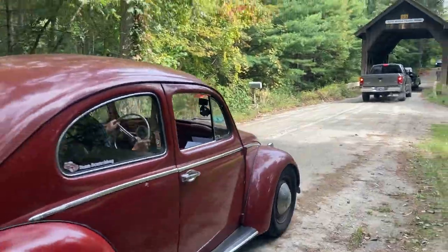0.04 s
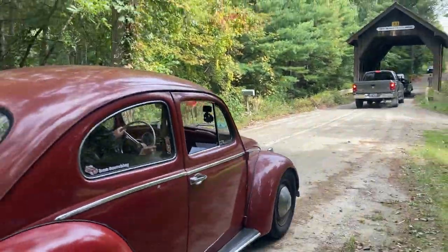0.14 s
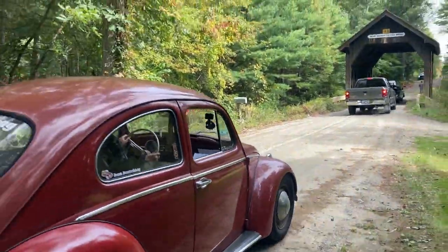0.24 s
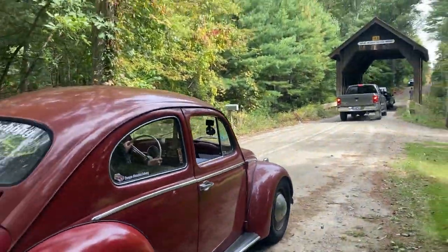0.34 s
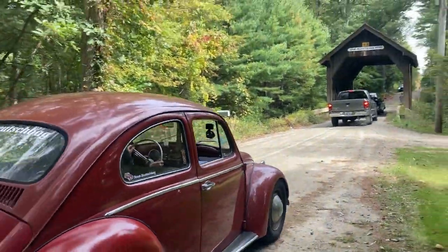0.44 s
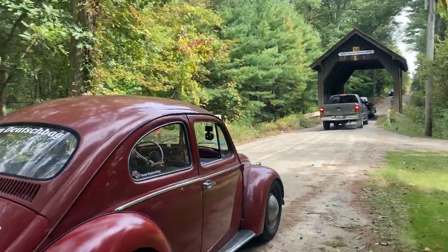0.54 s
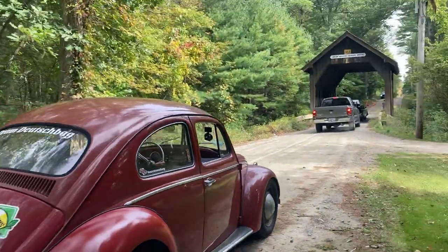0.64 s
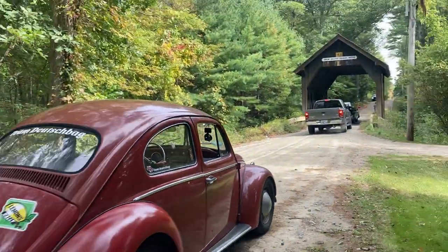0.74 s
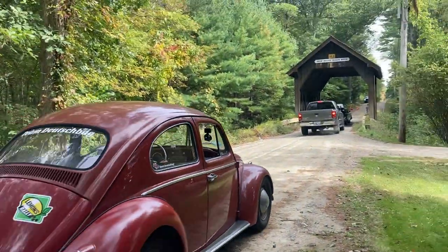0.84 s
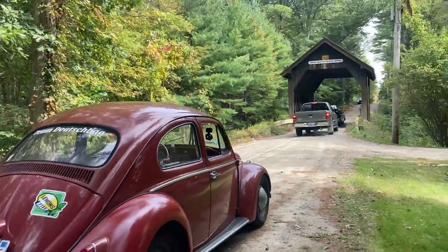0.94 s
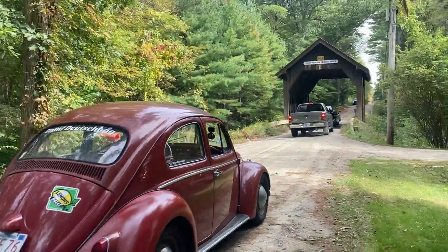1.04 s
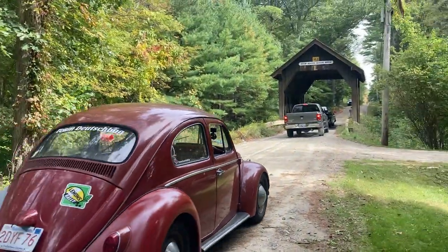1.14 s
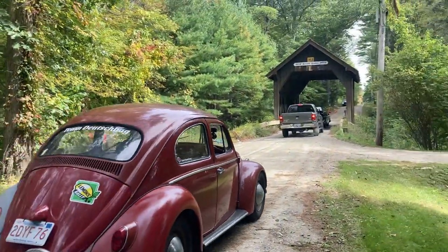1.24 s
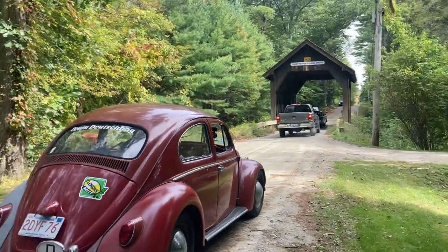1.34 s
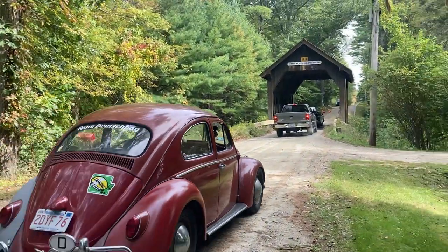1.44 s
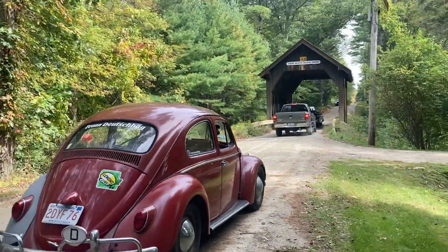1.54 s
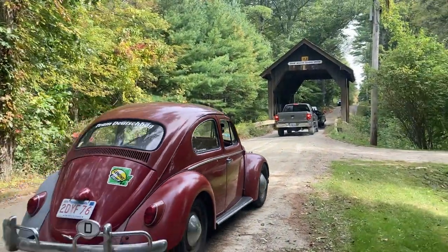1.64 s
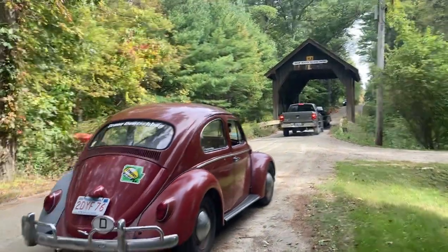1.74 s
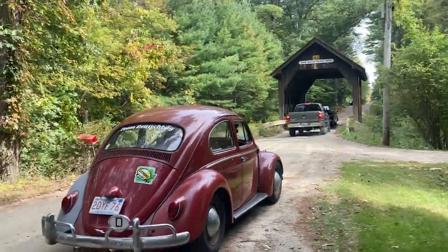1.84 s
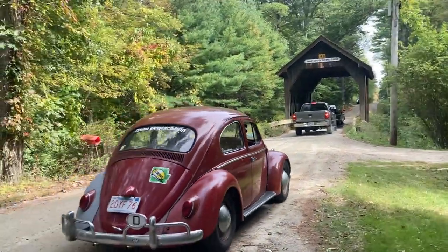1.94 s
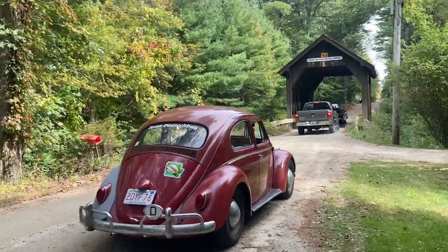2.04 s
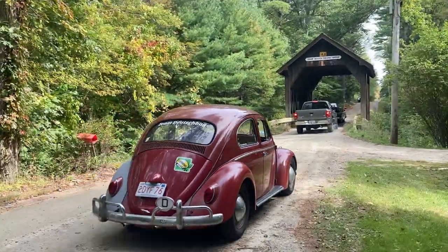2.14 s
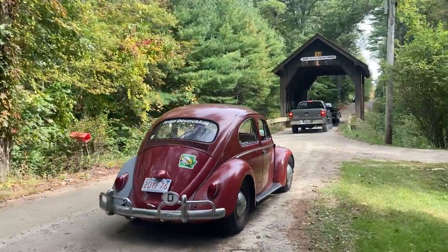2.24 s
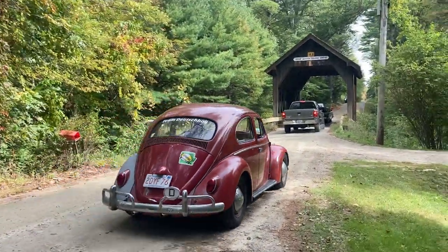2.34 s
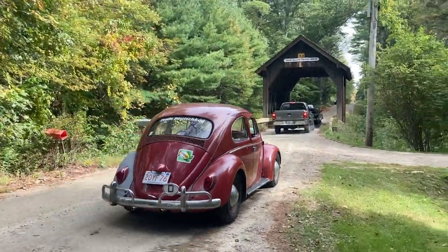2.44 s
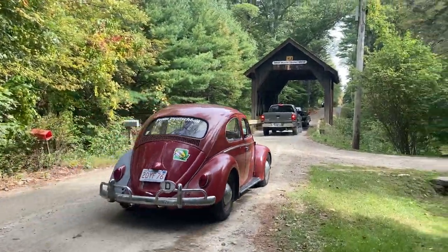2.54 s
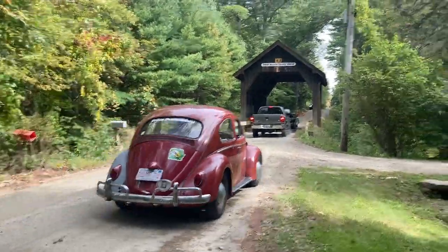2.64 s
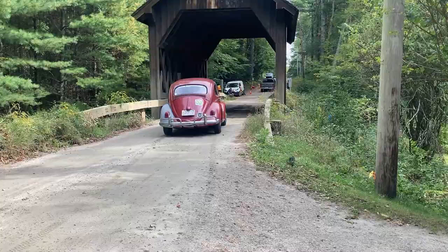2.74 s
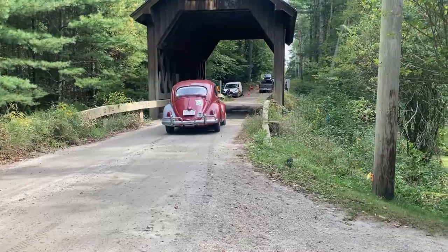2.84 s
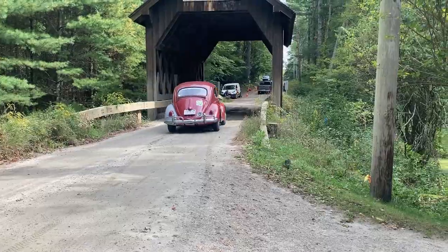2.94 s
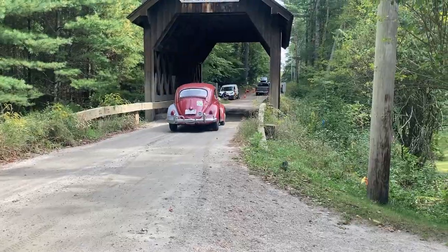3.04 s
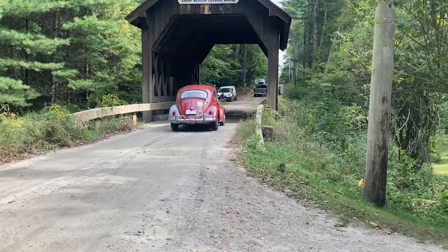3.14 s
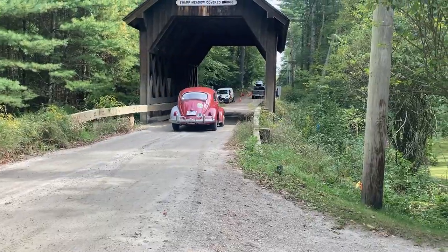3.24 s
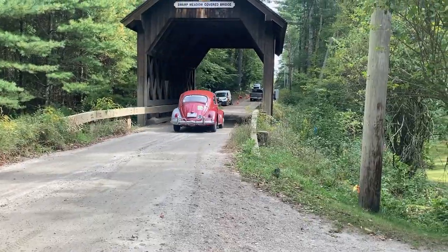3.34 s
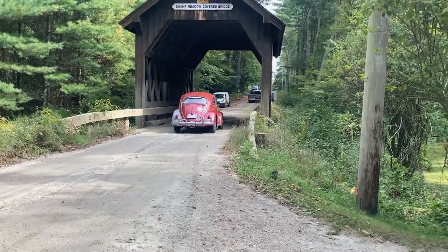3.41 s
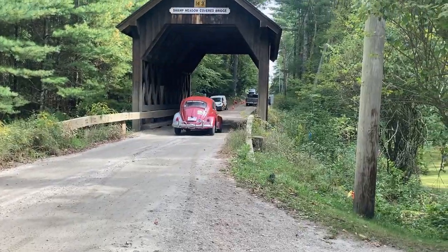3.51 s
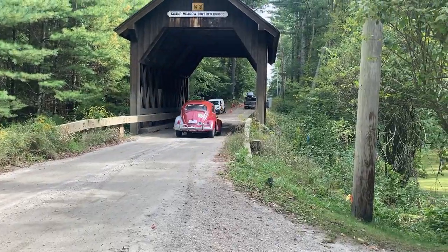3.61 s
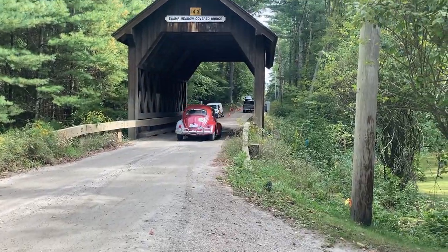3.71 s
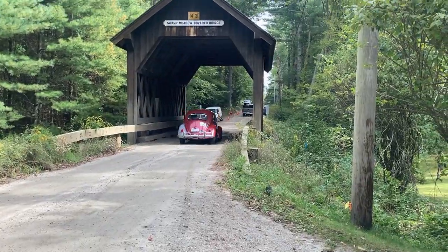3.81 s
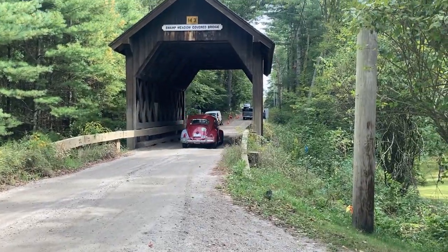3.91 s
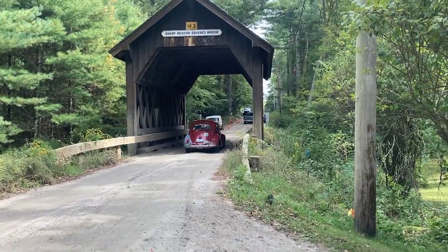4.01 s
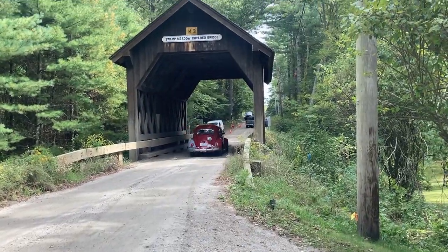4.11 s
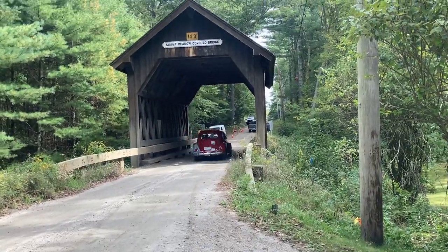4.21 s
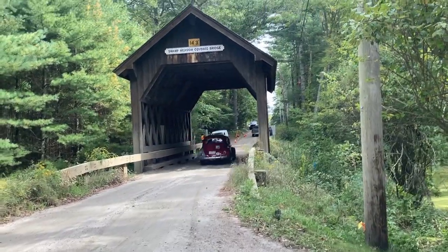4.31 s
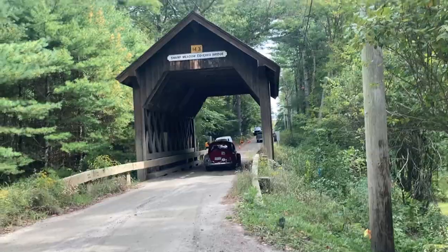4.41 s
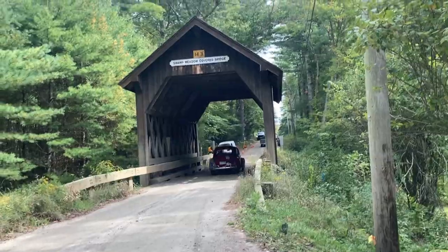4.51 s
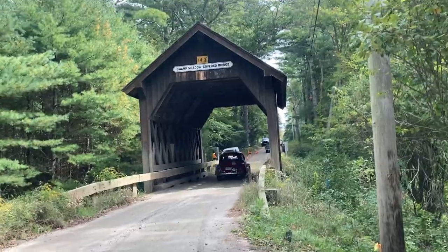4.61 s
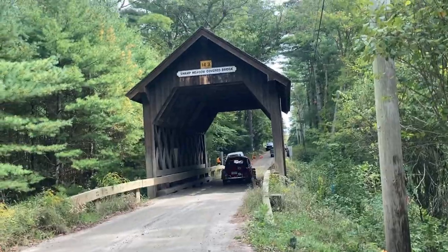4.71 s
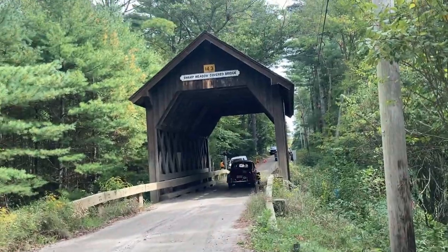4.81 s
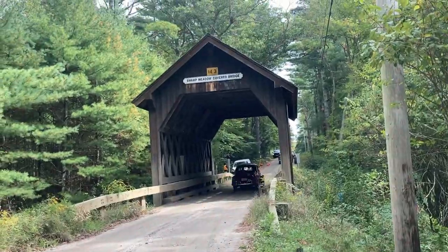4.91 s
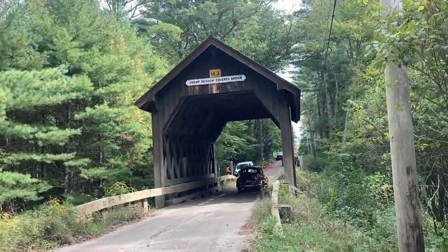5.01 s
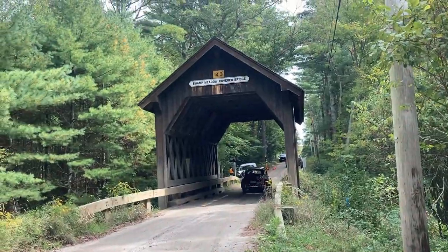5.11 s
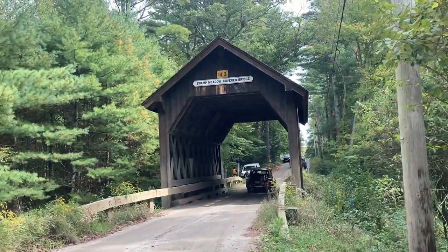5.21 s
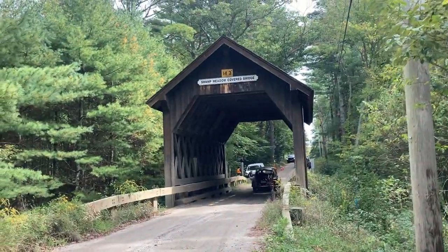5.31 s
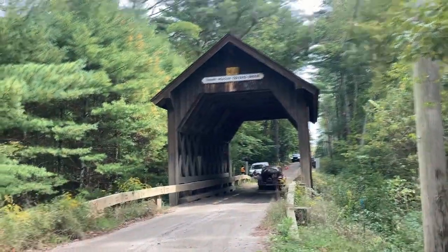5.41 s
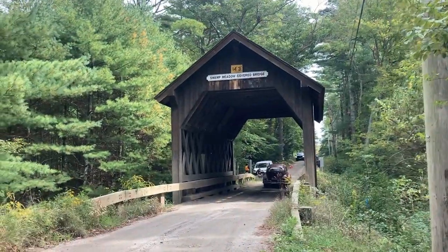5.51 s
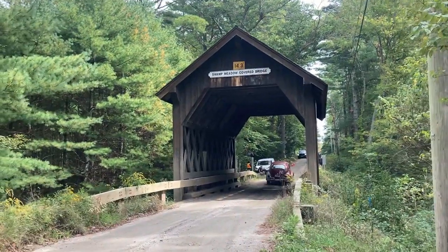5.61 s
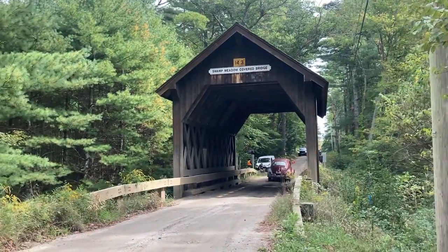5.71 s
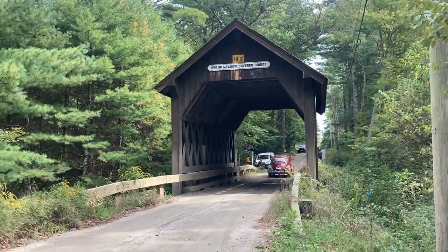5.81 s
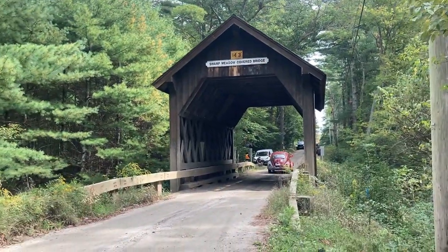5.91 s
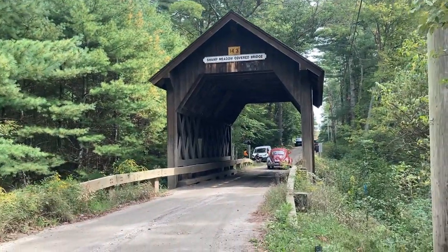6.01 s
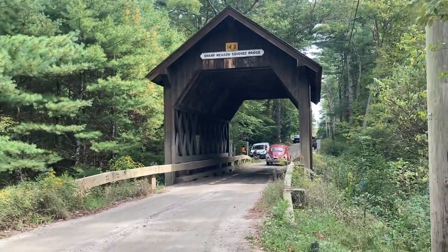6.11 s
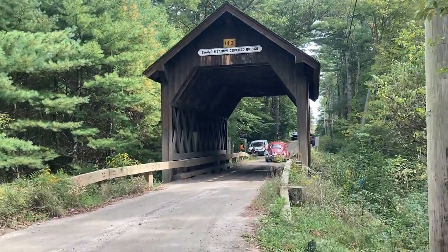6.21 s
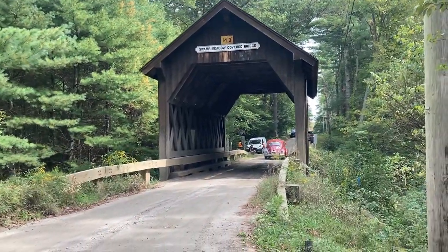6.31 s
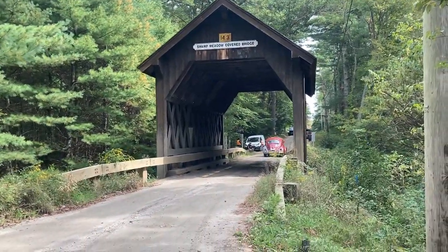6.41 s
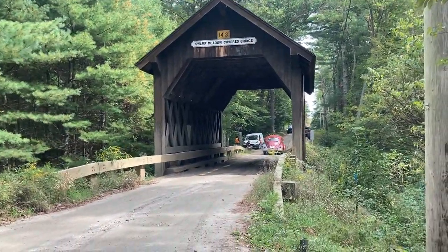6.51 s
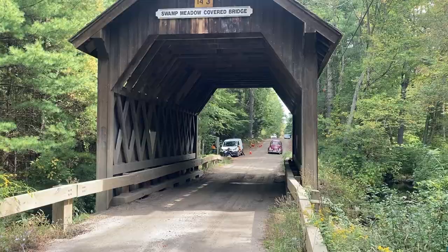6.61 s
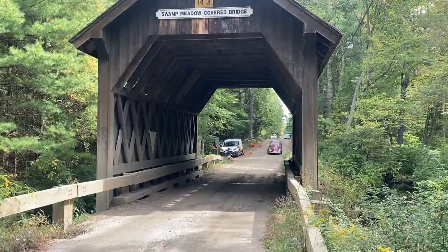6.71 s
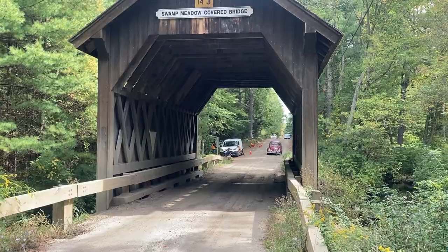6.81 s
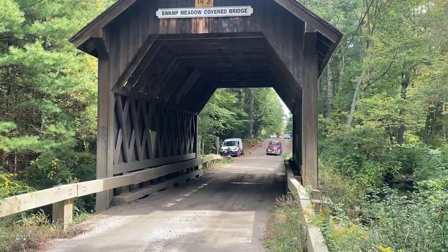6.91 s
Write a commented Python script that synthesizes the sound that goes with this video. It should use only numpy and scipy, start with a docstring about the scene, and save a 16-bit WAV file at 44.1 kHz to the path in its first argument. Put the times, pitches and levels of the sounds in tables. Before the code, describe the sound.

An old car's air-cooled engine lopes away with clanks and high chirps, then drones through a covered wooden bridge and fades.

```python
"""A loping engine beat: an old air-cooled flat-four pulls away on one cylinder too few, then drones through
a covered wooden bridge and fades. Each firing is a pressure pulse that excites the exhaust pipes, and the
bridge reinforces the harmonics near its resonances. Under load, gas chirps through a leaky exhaust joint.
Valve ticks and clanks ring the engine's sheet metal over the turbulent noise of fan, tyres and leaves;
a few hollow knocks and clicks of grit sound in between."""
import sys
import numpy as np
from scipy import signal
from scipy.fft import rfft, irfft, next_fast_len
from scipy.io import wavfile
from scipy.ndimage import uniform_filter1d, map_coordinates

SR = 44100
rng = np.random.default_rng(int(sys.argv[2]) if len(sys.argv) > 2 else 0)


def to_wav(sig):
    """Store sig (one row per channel, or 1-D mono) as 16-bit WAV at the path in sys.argv[1].

    Samples outside -1..1 are clipped; the rate is SR.
    """
    pcm = np.clip(np.atleast_2d(sig), -1, 1) * 32767
    pcm = np.round(pcm).astype(np.int16)
    wavfile.write(sys.argv[1], SR, pcm.T)  # frames by channels


N = 306495
TIME = np.arange(N) / SR
CYCLE = 4  # firings per engine cycle; "crank" is the running count of firings
SPLIT_HZ = 6400  # the stereo image follows the car only below this

# engine speed: time_s, firing_rate_hz
FIRING_RATE = [(0.0, 39.06), (0.72, 40.5), (1.0, 37.36), (1.31, 39.92), (1.45, 36.58), (1.74, 49.76),
               (1.95, 45.11), (2.28, 43.78), (2.6, 40.01), (3.25, 39.71), (3.8, 32.67), (4.25, 27.92),
               (4.75, 31.63), (5.4, 34.96), (5.95, 36.68), (6.3, 32.59), (6.95, 31.02)]
# spectrum of the fan inside the bridge: frequency_hz, level_db
HALL_SPECTRUM = [(200, -5), (310, -11), (400, -11), (490, 5.5), (565, 0.5), (660, 1), (810, 1), (1100, -4),
                 (1380, -7.5), (1490, -8), (1620, -5.5), (1900, -10), (2800, -20)]
# bright spectrum of escaping gas and of grit: frequency_hz, level_db
BRIGHT_SPECTRUM = [(1800, -32), (3500, -10), (5200, -12.5), (7500, -9), (11000, -7), (15500, -20.5)]


def amp(db):
    """Decibels to amplitude ratio."""
    return 10 ** (np.asarray(db) / 20)


def unit(x):
    """Normalisation to rms 1."""
    return x / np.sqrt(np.mean(x ** 2) + 1e-20)


def steady(x):
    """Running normalisation to rms 1 over a few tenths of a second."""
    size = SR // 5
    power = np.mean(np.atleast_2d(x) ** 2, axis=0)
    return x / np.sqrt(np.abs(uniform_filter1d(uniform_filter1d(power, size), size)) + 1e-20)


def along(points, hz):
    """Interpolation of (frequency_hz, value) points on a logarithmic frequency axis."""
    frequencies, values = np.transpose(points)
    return np.interp(np.log(hz + 1), np.log(frequencies + 1), values)


def curves(rows):
    """Linear interpolation, sample by sample, of each column after the time."""
    times, *columns = np.transpose(rows)
    return [np.interp(TIME, times, column) for column in columns]


def wobble(rate_hz):
    """Smooth random modulation: a spline through rate_hz random values a second."""
    return map_coordinates(rng.standard_normal(int(N * rate_hz / SR) + 4), [TIME * rate_hz])


def gate(crank, at, width, period):
    """Periodic Gaussian pulse; position, width and period are in firings."""
    offset = np.mod(crank - at + period / 2, period) - period / 2
    return np.exp(-.5 * (offset / width) ** 2)


def bursts(events, rise_s, fall_s):
    """Envelope with an exponential attack and decay at each (start_s, level_db) event."""
    envelope = np.zeros(N)
    for s, db, *_ in events:
        t = TIME[:min(SR // 4, N - round(s * SR))]
        envelope[round(s * SR):][:len(t)] += amp(db) * (1 - np.exp(-t / rise_s)) * np.exp(-t / fall_s)
    return envelope


def add(track, start_s, sound):
    """Superposition of a sound on a stereo track."""
    track[:, round(start_s * SR):][:, :sound.shape[1]] += sound


def filtered(x, response):
    """Linear filtering: the spectrum is multiplied by a complex frequency response."""
    size = next_fast_len(N + SR // 2)
    return irfft(rfft(x, size) * response(np.fft.rfftfreq(size, 1 / SR)), size)[..., :N]


def impulse_response(spectrum, size=16384):
    """Minimum-phase response with the given magnitude, by folding the cepstrum."""
    cepstrum = irfft(np.log(amp(along(spectrum, np.fft.rfftfreq(size, 1 / SR)))))
    cepstrum[1:size // 2] *= 2
    cepstrum[size // 2 + 1:] = 0
    return irfft(np.exp(rfft(cepstrum)))


def noise(spectrum):
    """Partially coherent stereo noise of rms 1, nearly mono in the bass."""
    # likeness of left and right: frequency_hz, correlation
    coherence = [(200, 0.94), (500, 0.94), (1200, 0.73), (2000, 0.32), (4500, 0.66), (6000, 0.31),
                 (7000, 1), (15000, 1)]

    def colour(hz):
        angle = np.arccos(np.clip(along(coherence, hz), -1, 1)) / 2
        lowpass = 1 / (1 + (hz / spectrum[-1][0] / 2) ** 4)
        highpass = 1 / (1 + (spectrum[0][0] / 2 / (hz + 1)) ** 4)
        return lowpass * highpass * amp(along(spectrum, hz)) * np.array([np.cos(angle), np.sin(angle)])
    mid, side = filtered(rng.standard_normal((2, N)), colour)
    return unit(np.array([mid + side, mid - side]))


def multipath(x, depth_db, size=1024):
    """Multipath fading: narrow bands swell and sink as the sound finds shifting paths."""
    bands = signal.stft(x, nperseg=size)[2]
    fading = uniform_filter1d(rng.standard_normal(bands.shape[1:]), size=3, axis=0)
    fading = unit(uniform_filter1d(fading, size=18, axis=1))
    return unit(signal.istft(bands * amp(depth_db * fading), nperseg=size)[1][:, :N])


def road_reflection(x, share, dull_hz=4500):
    """Comb filtering: a duller reflection off the road interferes with the direct sound."""
    # delay of the reflection as the car moves: time_s, lag_ms
    delays = [(0, .87), (.6, .87), (1.15, .74), (1.6, .85), (1.95, .88), (2.25, 1), (2.45, 1.02),
              (2.75, .83), (2.95, .85), (3.2, 1.15), (3.85, 1.66), (4.55, 1.37), (5.45, 1.35), (5.9, 1.6),
              (6.95, 1.66)]
    lag_s = curves(delays)[0] / 1000
    bounce = filtered(x, lambda hz: share / (1 + (hz / dull_hz) ** 4))
    return steady(x + np.array([np.interp(TIME - lag_s, TIME, side) for side in bounce]))


def reverberation(x):
    """Diffuse reflections from trees and timber walls form a short, exponentially decaying tail."""
    # reverberation time of the bridge: frequency_hz, t60_s
    decay_times = [(60, 0.4), (200, 0.95), (1000, 0.14), (8000, 0.19)]
    hz, t, bands = signal.stft(rng.standard_normal(SR // 2), SR, nperseg=256)
    tail = signal.istft(bands * amp(-60 * t / along(decay_times, hz)[:, None]), SR, nperseg=256)[1]
    return signal.fftconvolve(x, tail / np.linalg.norm(tail))[:N]


def beyond(fade_s, exit_s=6.185):
    """Linear ramp from 0 to 1 as the car leaves the far end of the bridge."""
    return np.clip((TIME - exit_s) / fade_s, 0, 1)


def placed(x):
    """An arrival-time difference carries the car from the left to the centre."""
    # head start at the left microphone: time_s, lead_ms
    bearing = [(0, 0.25), (1.2, 0.22), (2.1, 0.099), (3.2, 0.096), (5.2, -0.035), (6.95, -0.018)]
    lead_s = curves(bearing)[0] / 1000
    low = filtered(x, lambda hz: hz < SPLIT_HZ)
    moved = [map_coordinates(side, [(TIME + sign * lead_s / 2) * SR], mode="nearest")
             for side, sign in zip(low, (1, -1))]
    return x - low + np.array(moved)


def rumble():
    """Low noise under random amplitude modulation makes a faint, uneven rumble."""
    # rumble spectrum: frequency_hz, level_db
    spectrum = [(22, -24), (40, -10.5), (65, 1.5), (110, -6.5), (200, -10.5), (350, -21.5), (800, -31.5)]
    return amp(-36.5 + 2.5 * wobble(12)) * noise(spectrum)


def roadside(t60_s=0.037):
    """Impact sounds: a knock is a thud with two damped woody modes, a grit click a brief noise burst."""
    # hollow knocks: start_s, level_db, pitch_hz
    knocks = [(4.569, -32, 650), (4.852, -41, 1390), (4.861, -24.5, 464), (5.305, -26, 375),
              (6.025, -28, 810), (6.037, -31, 806), (6.786, -29, 380), (6.833, -34, 896)]
    # spectrum of their thud: frequency_hz, level_db
    thud_spectrum = [(60, -21), (150, 4), (350, 11.5), (800, 4.5), (1600, -0.5), (3000, -11), (8000, -24)]
    # clicks of grit: start_s, level_db
    grit = [(3.5394, -48), (5.7788, -27.5), (6.764, -34.5)]
    wood, t = np.zeros(N), TIME[:SR // 10]
    for s, db, hz in knocks:
        modes = np.sin(2 * np.pi * hz * t) + 0.41 * np.sin(2 * np.pi * 1.49 * hz * t)
        wood[round(s * SR):][:len(t)] += amp(db - 2 - 60 * t / t60_s) * modes
    thuds = bursts(knocks, rise_s=0.00098, fall_s=0.017) * noise(thud_spectrum)
    clicks = bursts(grit, rise_s=0.00037, fall_s=0.0075) * noise(BRIGHT_SPECTRUM)
    return wood + amp(-6) * (thuds + clicks)


def throb(crank, t60_s=0.26, accent=0.39):
    """Periodic excitation: each firing rings the timber hall alike, so the harmonics follow the revs."""
    firings = np.arange(int(crank[-1]))
    onsets = np.round(np.interp(firings, crank, TIME) * SR).astype(int)
    beats = np.bincount(onsets, 1 + accent * (firings % 2), N)
    t = TIME[:SR // 4]
    tail = noise(HALL_SPECTRUM)[:, :len(t)] * amp(-60 * t / t60_s)
    return steady(signal.fftconvolve(beats[None], tail, axes=1)[:, :N])


def moving_air(crank, inside, mouth_s=2.74, mouth_fade_s=0.55):
    """Turbulence noise: whirr and hiss pulse with the crank nearby; far off the hiss is an even rush."""
    # strength of the air noise: time_s, whirr_db, hiss_db
    levels = [(0, -28, -35.5), (0.6, -31.5, -32), (1.5, -32, -32.5), (1.72, -37, -38), (2.4, -35.5, -37.5),
              (2.9, -38, -37.5), (3.3, -35.5, -43.5), (4.15, -40, -45.5), (6.1, -38.5, -44.5)]
    # spectra of the fan, the engine's hiss, and tyres and leaves: frequency_hz, level_db
    fan_spectrum = [(200, -21.5), (380, 0), (450, 1), (510, -5.5), (590, -3), (680, 0), (750, 2.5),
                    (830, -3.5), (950, -2.5), (1200, -7.5), (1500, -5.5), (2000, -8.5), (2800, -16.5)]
    engine_spectrum = [(1300, -16), (2000, -3.5), (2400, 2), (2900, 0.5), (3400, 0.5), (4200, -1),
                       (5500, -1.5), (7000, -1), (10000, -1), (13000, -4.5), (15500, -8)]
    road_spectrum = [(1300, -39), (2000, 4.5), (3000, 4.5), (4300, 6.5), (5300, -2.5), (6800, 6),
                     (8000, 1.5), (11000, 2.5), (15000, -6.5)]
    walled = np.clip((TIME - mouth_s) / mouth_fade_s, 0, 1)  # the bridge takes over the colour
    far = np.maximum(inside, walled)
    # the dead cylinder blows unburnt charge where its bang should be
    chuff = unit(1 + 0.3 * gate(crank, 1.9, 0.22, CYCLE) + 0.43 * gate(crank, 0.18, 0.46, period=1))
    hall = unit(noise(HALL_SPECTRUM) + .9 * throb(crank))
    fan = chuff * multipath(noise(fan_spectrum), depth_db=2.0)
    whirr = road_reflection(np.sqrt(1 - walled) * fan + np.sqrt(walled) * hall, share=.4)
    # the valve gear spits once a turn of the crankshaft
    ticks = unit(1 + 0.5 * gate(crank, 1.265, 0.29, period=2) + 0.5 * gate(crank, 3.7, 0.55, CYCLE))
    spit = amp(1.9 + 2.8 * wobble(60)) * ticks * multipath(noise(engine_spectrum), depth_db=2.5)
    road = multipath(noise(road_spectrum), depth_db=1.2)
    hiss = road_reflection(np.sqrt(1 - far) * spit + np.sqrt(far) * road, share=.33)
    whirr_db, hiss_db = curves(levels)
    whirr_db += -1.5 + 0.61 * wobble(25) - 9 * beyond(fade_s=0.23)
    hiss_db += 0.14 + 0.63 * wobble(12) - 17.5 * beyond(fade_s=0.43)
    return amp(whirr_db) * whirr + amp(hiss_db) * hiss


def tin_tap(pitch_hz, spread_octaves=0.36, others_db=-19, scatter_db=3, detune=0.011, rise_s=0.00016):
    """Modal ringing of struck sheet metal, peak 1; the modes near pitch_hz are excited most."""
    # modes of the rocker covers and engine tin: frequency_hz, level_db, t60_s
    modes = [(896, 6, 0.083), (1071, 1, .05), (1212, 8, .06), (1478, 15.5, 0.033), (2195, 4.5, 0.069),
             (2395, 1, 0.058), (2773, -2, 0.16), (3100, 5, 0.06), (3295, -4.5, 0.19), (3520, 2, 0.11),
             (3770, 0.5, 0.097), (4400, 1.5, 0.068), (6900, -2.5, .05)]
    t = TIME[:SR // 14]
    hz, db, t60_s = np.transpose(modes)[:, :, None]
    chance = rng.standard_normal((4, len(hz), 1))
    excitation = np.exp(-.5 * (np.log2(hz / pitch_hz) / spread_octaves) ** 2) + amp(others_db)
    envelopes = excitation * amp(db + scatter_db * chance[0] - 60 * t / t60_s)
    phase = 2 * np.pi * (hz * (1 + detune * chance[1]) * t + rng.random(hz.shape))
    stereo_phase = 0.28 * np.pi * chance[2:]
    tap = (envelopes * np.sin(phase + stereo_phase)).sum(axis=1) * (1 - np.exp(-t / rise_s))
    return tap / np.abs(tap).max()


def tappets(crank, turn_s=1.66, turn_length_s=.8, scatter_db=3.0):
    """Each valve taps the tin once a cycle; directivity shifts the balance as the car turns its back."""
    # clatter, plainest while the engine lid faces the microphone: time_s, level_db
    levels = [(0, -36.5), (.75, -36), (1.1, -40.5), (1.5, -42.5), (1.9, -44.5), (2.3, -41), (2.9, -45),
              (3.2, -51), (3.8, -50.5), (4.2, -54), (4.6, -70)]
    # taps within a cycle, heard from two sides: position_firings, pitch_hz, side_db, behind_db
    valves = [(1.149, 950, -4, -11), (1.219, 2400, -6, -1), (2.201, 1000, -10, -13), (2.25, 2250, -4, -5),
              (3.07, 1000, -8, -9.5), (3.25, 3450, -4.5, 0), (3.281, 2300, -11.5, 1),
              (3.97, 3600, -5.5, -5.5)]
    clatter, end_s = np.zeros((2, N + SR)), levels[-1][0]
    for cycle in np.arange(0, np.interp(end_s, TIME, crank), CYCLE):
        for position, hz, side_db, behind_db in valves:
            s = np.interp(cycle + position, crank, TIME)
            behind = np.clip((s - turn_s) / turn_length_s + .5, 0, 1)
            db = side_db + behind * (behind_db - side_db) + scatter_db * rng.standard_normal()
            add(clatter, s, amp(db) * tin_tap(hz))
    return (TIME < end_s) * amp(curves(levels)[0]) * road_reflection(clatter[:, :N], share=0.16)


def clanks():
    """Impact excitation: now and then a valve taps much harder, and the engine tin rings out loudly as the car
    lopes off."""
    # harder valve taps on the tin: start_s, peak_db, pitch_hz
    strikes = [(0.03, -16.5, 885), (0.132, -34, 880), (0.179, -20, 940), (0.234, -18, 850),
               (0.3865, -51, 3440), (0.4868, -31, 3320), (0.5876, -24, 3460), (0.638, -16, 1150),
               (0.6858, -35, 3430), (0.8036, -24, 3650), (1.254, -19, 1290), (1.352, -17, 1400),
               (1.454, -19, 1210), (2.204, -24.5, 1050)]
    track = np.zeros((2, N + SR))
    for s, db, hz in strikes:
        add(track, s, amp(db) * tin_tap(hz))
    return track[:, :N]


def leak(centre_s=0.0014, width_s=0.0019, fall_hz_per_s=190000, rough_rad=0.57):
    """Jet noise: gas spits through a loose joint, each puff of hiss holding a rough, falling whistle."""
    # spits of the joint: start_s, chirp_db, pitch_hz, hiss_db
    spits = [(0.8525, -20.5, 9700, -23.5), (0.879, -22, 10200, -29.5), (0.957, -11, 10300, -22.5),
             (1.0635, -12.5, 10400, -21), (1.1515, -31, 11500, -44), (1.168, -15, 10100, -28),
             (1.1944, -30, 10800, -26), (1.217, -28, 10900, -22), (1.271, -14, 10340, -25),
             (1.399, -17, 10200, -36.5), (1.5049, -9.5, 10300, -32), (1.529, -12, 10200, -23),
             (1.5776, -2.5, 10900, -27.5), (1.602, -5.5, 11150, -35), (1.623, -7, 10800, -29),
             (1.6669, -2.5, 11440, -23.5), (1.69, -6, 11400, -43), (1.7096, -14.5, 10900, -28),
             (1.7512, -17, 10900, -24.5), (1.773, -23, 11950, -37), (1.7916, -13, 11100, -29),
             (1.8322, -13.5, 11740, -24), (1.8549, -20, 11400, -26), (1.8743, -18.5, 11000, -28.5),
             (1.9177, -10, 10800, -27), (1.9625, -9.5, 11100, -28.5), (2.008, -10.5, 11350, -25.5),
             (2.031, -10, 11400, -32), (2.052, -12.5, 11200, -24), (2.1186, -8.5, 11140, -28)]
    whistle, t = np.zeros(N), TIME[:SR // 50] - centre_s
    for s, db, hz, _ in spits:
        flutter = unit(uniform_filter1d(uniform_filter1d(rng.standard_normal(len(t)), 30), 30))
        tone = np.sin(2 * np.pi * (hz * t - fall_hz_per_s * t ** 2 / 2) + rough_rad * flutter)
        whistle[round(s * SR):][:len(t)] += amp(db - 1.5) * np.exp(-.5 * (t / width_s) ** 2) * tone
    puff = amp(3) * bursts([(s, db) for s, _, _, db in spits], rise_s=.0008, fall_s=.0045)
    spray = amp(-12) * bursts(spits, rise_s=.001, fall_s=.0028)
    return whistle + (puff + spray) * noise(BRIGHT_SPECTRUM)


def drone(crank, full_from_s=4.27, full_to_s=5.76, fade_db_per_s=33, flutter_db=2.0):
    """Forced resonance: engine harmonics swell as they sweep through the air modes of the bridge."""
    # harmonics of the firing rate: order, level_db
    harmonics = [(3, -5.5), (4, -4), (5, -1.5), (6, -1.5), (7, -5.5), (8, -5), (9, -1.5), (11, 4.5),
                 (12, -2), (16, -10), (23, -6)]
    # response of the air in the bridge: frequency_hz, gain_db
    resonances = [(90, -5), (106, -1), (120, -9), (132, -7), (152, 3.5), (172, 1.5), (192, 6), (212, -3),
                  (240, -6), (300, -16), (370, -24), (450, -33), (570, -11.5), (680, -26.5), (820, -15),
                  (900, -34)]
    rate_hz, = curves(FIRING_RATE)
    away_s = np.maximum(full_from_s - TIME, 0) + np.maximum(TIME - full_to_s, 0)
    tones = np.zeros(N)
    for order in range(3, 24):
        db = along(harmonics, order) + along(resonances, order * rate_hz) + flutter_db * wobble(24)
        tones += amp(db) * np.sin(2 * np.pi * (order * crank + rng.random()))
    return np.sqrt(2) * amp(-36 - fade_db_per_s * away_s) * tones


def blowdown(crank):
    """Pulsed turbulence: gas rushes out as each exhaust valve opens."""
    # surges within a cycle: position_firings, width_firings, strength
    surges = [(.3, 0.19, 0.41), (1.4, 0.074, 0.63), (1.95, 0.15, 0.54), (2.3, 0.033, 0.35),
              (3.15, 0.2, 0.91)]
    # spectrum of the gas: frequency_hz, level_db
    spectrum = [(60, -26), (120, -8), (210, -7), (300, -7), (400, -13), (460, -9), (530, -19.5), (600, -55),
                (1200, -75)]
    flow = .45 + sum(strength * gate(crank, at, width, CYCLE) for at, width, strength in surges)
    return unit(flow) * noise(spectrum)


def firing_pulses(crank, misfire, scatter_db=0.84, jitter_s=0.00014, stumble_db=-10.5):
    """Pulse train of bangs and softer piston pushes; one bang missing in four makes subharmonics."""
    # misfiring cylinders in firing order: bang_size, bang_lag_firings, push_size, push_lag_firings
    misfiring = [(1.05, .27, .3, .6), (.02, .3, .45, .73), (.9, .27, .33, .98), (1.35, .31, .6, .74)]
    # the same columns for every cylinder of the evenly running engine
    even = (0.85, 0.2965, 0.76, 0.786)
    # a live cylinder fails to catch as the clutch bites: time_s
    stumbles = [1.376, 1.48, 1.94, 2.095]
    firings = np.arange(int(crank[-1]) + 1)
    uneven = np.interp(firings, crank, misfire)[:, None]
    blend = uneven * np.array(misfiring)[firings % CYCLE] + (1 - uneven) * np.array(even)
    bang, bang_lag, push, push_lag = blend.T
    stumbled = np.isin(firings, np.round(np.interp(stumbles, TIME, crank)))
    chance = rng.standard_normal((len(firings), 4)).T

    def train(sizes, lag, offset_s):
        times = np.interp(firings + lag, crank, TIME) + offset_s
        return np.bincount(np.clip(np.round(times * SR).astype(int), 0, N - 1), sizes, N)
    bangs = train(bang * amp(scatter_db * chance[1] + stumble_db * stumbled), bang_lag, jitter_s * chance[0])
    pushes = train(push * amp(1.1 * chance[2]), push_lag, jitter_s * chance[3])
    return bangs + pushes


def exhaust(crank, misfire, inside, crossover_hz=105, lag_s_per_hz=.000006):
    """Source and filter: the firing pulses ring the pipes, giving a low boom and a higher bark."""
    # spectrum of one puff from the tail pipes: frequency_hz, level_db
    pipe_spectrum = [(24, -53.5), (33, -7), (42, 14.5), (60, 18), (80, 10.5), (100, 2), (130, -1),
                     (165, -4), (212, -5), (250, -14.5), (300, -13.5), (350, -22), (450, -37.5), (650, -45),
                     (1500, -59.5)]
    # levels, falling with distance and as the throttle eases: time_s, boom_db, bark_db
    levels = [(0, -16, -22), (1.25, -16.5, -20), (1.75, -21.5, -22), (2.9, -22.5, -23.5),
              (3.3, -30.5, -28.5), (3.75, -24, -30), (4.15, -32, -35.5), (4.6, -25, -40.5),
              (5.92, -29, -40), (6.12, -27, -35)]
    pipe = signal.fftconvolve(firing_pulses(crank, misfire), impulse_response(pipe_spectrum))[:N]
    # dispersion: the silencer delays higher frequencies a little longer
    pipe = filtered(pipe, lambda hz: np.exp(-1j * np.pi * lag_s_per_hz * hz ** 2))
    boom = filtered(pipe, lambda hz: 1 / (1 + (hz / crossover_hz) ** 8))
    bark = pipe - boom
    # the bridge favours the upper part of the bark
    low_bark = filtered(bark, lambda hz: np.exp(-.5 * ((hz - 125) / 30) ** 2))
    bark = steady(bark - 0.27 * inside * low_bark)
    gas = amp(-7 - 7.2 * inside) * blowdown(crank)
    echo = amp(-10 + 14 * inside) * steady(reverberation(bark))
    boom_db, bark_db = curves(levels)
    boom = amp(boom_db - 1.7 - 13 * beyond(fade_s=0.082)) * steady(boom)
    bark = amp(bark_db - 0.35) * steady(bark + echo + gas)
    return amp(-24 * beyond(fade_s=0.25)) * (boom + bark)


def scene():
    """Superposition of the sources; one crank phase keeps exhaust, drone, air and valves in step."""
    # depth of the misfire and way towards and into the bridge: time_s, misfire_share, inside_share
    drive = [(0, 0.74, 0.34), (1.35, 0.79, 0), (1.7, 0.97, 0.47), (2.3, 1, 0.48), (3, 0.79, 0.46),
             (3.6, 0.29, 0.82), (4.5, 0.13, 1), (6.95, 0, 0.6)]
    crank = np.cumsum(curves(FIRING_RATE)[0]) / SR
    misfire, inside = np.clip(curves(drive), 0, 1)
    engine = exhaust(crank, misfire, inside) + rumble() + drone(crank)
    car = engine + moving_air(crank, inside) + tappets(crank) + clanks() + leak()
    return placed(car) + roadside()


def record(dry, top_hz=15900):
    """Level and phase differences: a band-limited microphone pair leans left and shifts the top treble."""
    # balance of the pair: frequency_hz, left_minus_right_db
    lean = [(60, -.4), (200, .3), (330, 1), (500, 3.5), (700, 4), (1300, 2.3), (2400, 1), (4400, 0.4),
            (15000, -0.1)]

    def pair(hz):
        sides = np.array([[.5], [-.5]])
        shift_rad = -2 * np.pi * (hz - 6900) / 4500 * (hz > SPLIT_HZ)
        return amp(sides * along(lean, hz)) * np.exp(1j * sides * shift_rad) * (hz < top_hz)
    return filtered(dry, pair)


dry = scene()
out = record(dry)
to_wav(out)
```